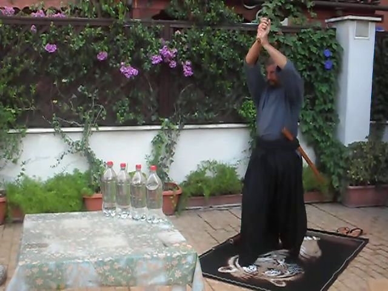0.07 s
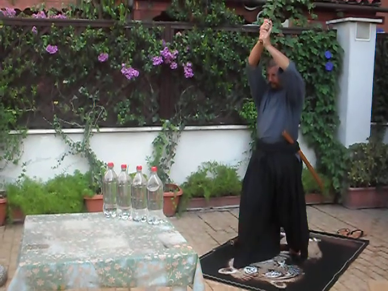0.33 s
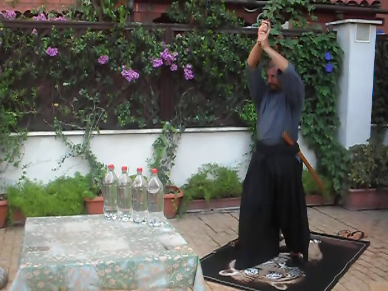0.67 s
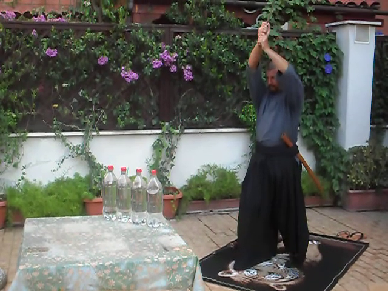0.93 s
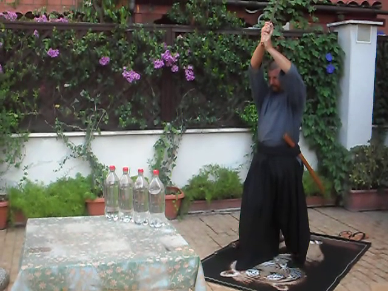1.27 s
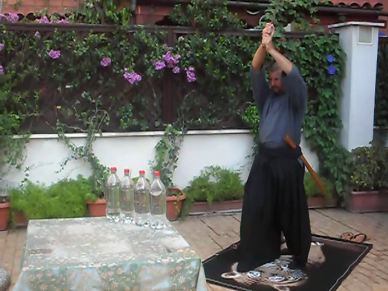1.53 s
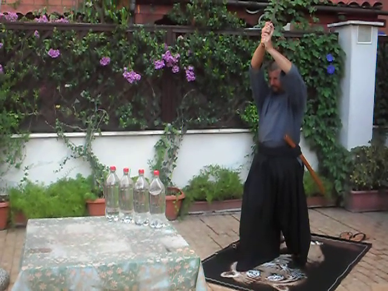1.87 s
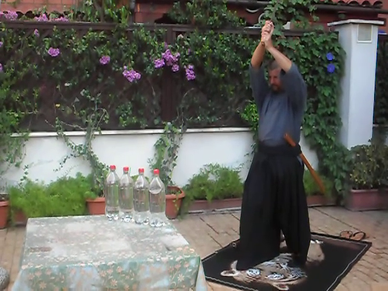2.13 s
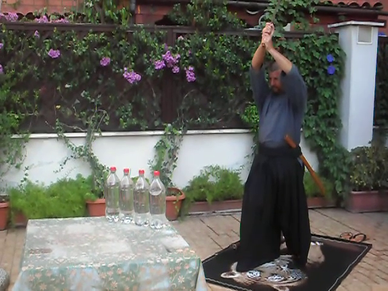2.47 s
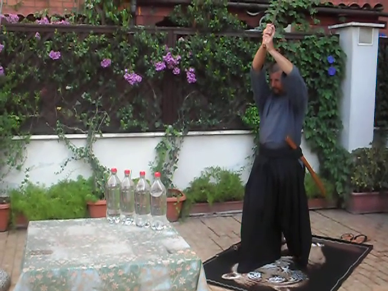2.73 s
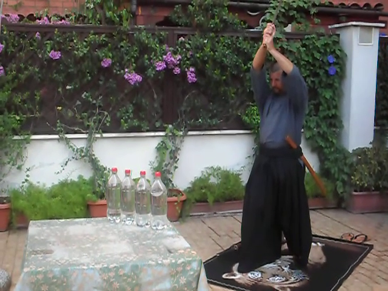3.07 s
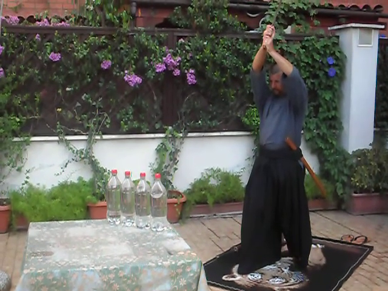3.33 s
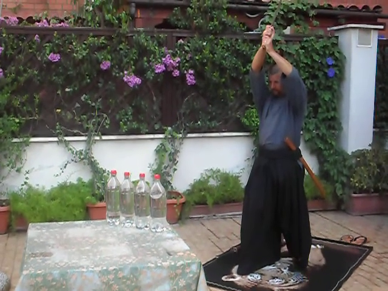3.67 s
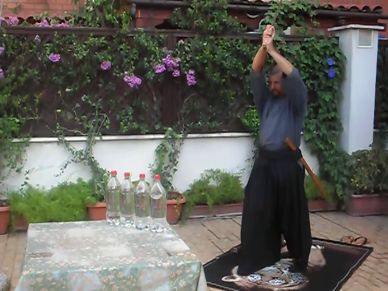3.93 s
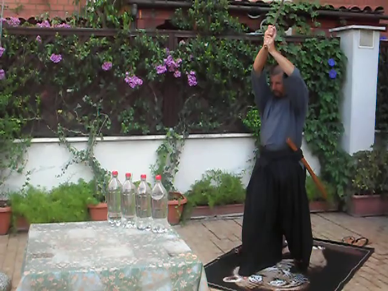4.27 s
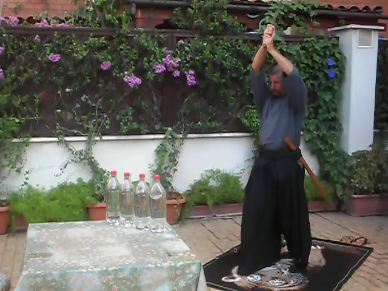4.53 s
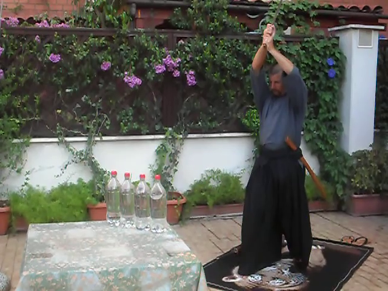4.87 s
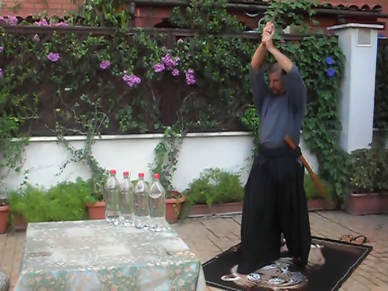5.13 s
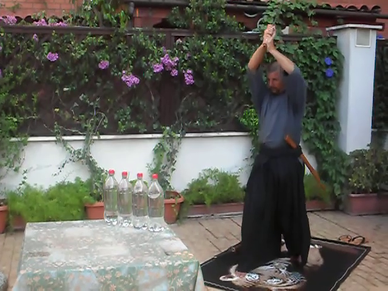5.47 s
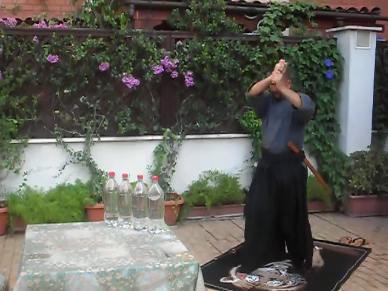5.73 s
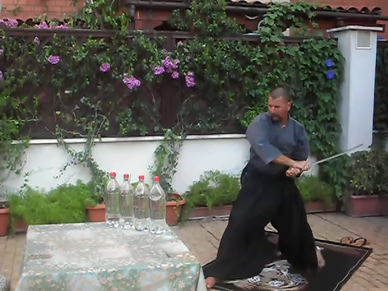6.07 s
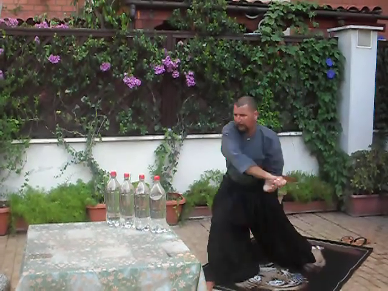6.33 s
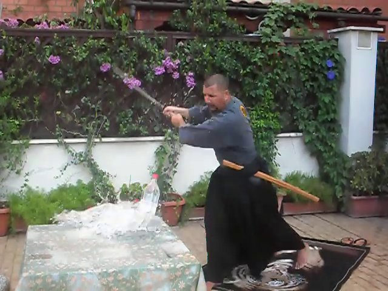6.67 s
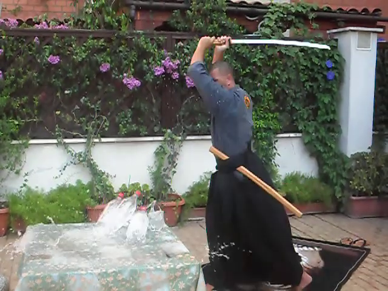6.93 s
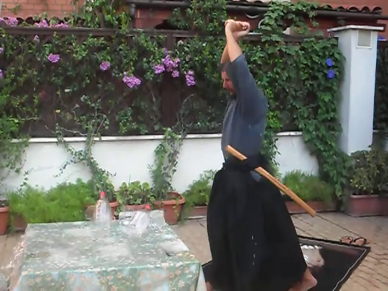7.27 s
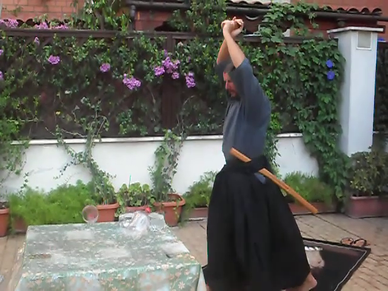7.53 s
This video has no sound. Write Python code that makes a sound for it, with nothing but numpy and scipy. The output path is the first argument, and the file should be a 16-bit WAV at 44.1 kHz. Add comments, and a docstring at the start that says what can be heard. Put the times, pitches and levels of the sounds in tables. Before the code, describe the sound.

A low, steady outdoor rumble with faint hiss runs throughout on a quiet walled patio. A tiny dry tick comes at 0.4 seconds. Around 1.2 seconds a small bird gives two quick, faint warbles, and three soft, distant hoots fall between 1.1 and 2.3 seconds. Only the background follows until a few light ticks at 6.3 seconds. At 6.5 seconds a sword cuts through four water-filled plastic bottles almost at once: a loud crack with a thump, slightly overloading the microphone and echoing briefly off the walls. Water slops and splats onto a table until about 6.9 seconds, with small snaps of plastic, then spatters brightly on the paving to the end. At 7.1 and 7.6 seconds two cut bottles hit the ground with loud, hollow, crunching thuds. Water sloshes inside each, and the last leaves a short hollow ring.

```python
"""In the low rumble of a quiet walled patio, a small bird warbles twice among faint, distant hoots.
After a few dry ticks, at 6.5 s, a sword cuts four water-filled plastic bottles on a table: each shell
cracks, each water column thumps in its modes, and the loudest blows overload the microphone.
Water slops onto the table, then spatters on the paving as countless small impacts. At 7.1 s and 7.6 s
two cut bottles land with hollow thuds; water sloshes inside them and the enclosed air resonates."""
import sys
import numpy as np
from scipy import signal
from scipy.fft import rfft, irfft
from scipy.io import wavfile
from scipy.ndimage import uniform_filter1d

SR = 44100
rng = np.random.default_rng(int(sys.argv[2]) if len(sys.argv) > 2 else 0)


def inscribe(sig):
    """Save sig as 16-bit PCM at rate SR to the path in sys.argv[1].

    A 1-D sig is mono; a 2-D sig holds one channel per row.
    Samples are clipped to [-1, 1] before scaling.
    """
    pcm = np.round(np.clip(np.atleast_2d(sig).T, -1, 1) * 32767)
    wavfile.write(sys.argv[1], SR, pcm.astype(np.int16))


N = 340011
TIME = np.arange(N) / SR
RING_TIME = TIME[:SR // 2]

# spectrum of the outdoor background: frequency_hz, level_db
AIR_SPECTRUM = [(8.8, -63), (15, -1), (37, 1.5), (108, -12.5), (124, -15.5), (226, -18.5), (306, -20.5),
                (332, -23), (414, -24), (461, -25), (529, -26), (2330, -35), (6070, -38), (7350, -39),
                (10500, -40.5), (13600, -57), (22000, -120)]
# reverberation time of the patio: frequency_hz, t60_s
PATIO_DECAY = [(120, 0.39), (400, 0.35), (1000, 0.44), (2500, 0.37), (6000, 0.32), (11000, 0.14)]
# first reflections from ground and walls: delay_s, level_db
REFLECTIONS = [(.0052, -18.5), (0.0112, -23), (0.0272, -15.5), (.062, -30), (0.075, -25)]
# distant hoots: start_s, length_s, pitch_hz, level_db
HOOTS = [(1.121, 0.057, 586, -57), (1.63, 0.15, 506, -62), (2.02, 0.23, 475.5, -66)]
# the bird's syllables: start_s, length_s, centre_hz, warble_hz, level_db
SYLLABLES = [(1.187, 0.078, 4250, 26, -56), (1.253, .074, 3420, 28, -59)]
# dry ticks before the cut: start_s, peak_db, centre_hz, t60_s
TICKS = [(0.4435, -38.5, 1000, .008), (6.2882, -39, 2780, .019), (6.289, -41, 5700, .008),
         (6.295, -39, 1880, 0.02)]
# cut plastic snapping as it tumbles: start_s, peak_db, centre_hz
SNAPS = [(6.661, -25, 2560), (6.762, -29, 3500), (6.843, -28, 3070), (7.553, -19, 2208)]
# the largest drops striking stone: start_s, peak_db
BIG_DROPS = [(6.821, -20.5), (6.977, -27), (7.01, -19), (7.24, -25), (7.3018, -19), (7.341, -19),
             (7.454, -24), (7.4774, -21.5)]
# air resonances of the open bottles: start_s, pitch_hz, climb_hz_per_s, level_db, t60_s
CAVITY_TONES = [(7.255, 290, 651, -37, 0.79), (7.615, 436.4, 0, -18, 0.34)]
# water surging inside each fallen bottle: start_s, level_db
SLOSHES = [(7.105, -24.5), (7.605, -26)]
# spectrum of that enclosed water: frequency_hz, level_db
SLOSH_SPECTRUM = [(100, -30), (220, -9), (330, -3), (480, -3.5), (700, -8.5), (1050, -11.5), (1600, -17.5),
                  (5000, -33), (12000, -60)]
# masses of water landing on the table: start_s, hold_s, level_db
SLOPS = [(6.5, 0.051, -26), (6.62, 0.076, -28), (6.754, .012, -29), (6.816, .012, -34.5), (6.9, .005, -37)]
# spectrum of water on the table: frequency_hz, level_db
SLOP_SPECTRUM = [(29, -43), (50, -1.5), (297, 3.5), (436, -4), (840, 0.5), (898, -5.5), (1080, -5.5),
                 (2020, -11), (3040, -12.5), (4560, -19.5), (6700, -19), (9610, -31), (11000, -50),
                 (14300, -79), (22000, -120)]
# heavy splats of water: start_s, peak_db, centre_hz, t60_s
SPLATS = [(6.579, -17, 260, 0.033), (6.623, -17, 330, 0.05), (6.644, -20.5, 487, 0.16),
          (6.688, -19.5, 746, 0.074), (6.76, -20.5, 149, 0.047), (6.778, -23.5, 406, 0.078),
          (6.825, -23.5, 720, 0.067)]
# showers of thrown water reaching the paving: start_s, level_db, t60_s
SHOWERS = [(6.49, -33, .36), (6.64, -44, 1.1), (6.914, -34, 1.3), (6.955, -35.5, 3.1), (7.255, -37.5, 13)]
# spectrum of drops on stone: frequency_hz, level_db
SPATTER_SPECTRUM = [(300, -16), (1200, -12), (2000, -6.5), (3000, -1), (4300, -4), (6000, -2.5),
                    (8000, -6.5), (10000, -10), (12000, -24)]
# blows on the ground, one list per fallen bottle: start_s, ring_db, crunch_db
LANDINGS = [
    [(7.0642, -0.5, -11), (7.0719, -0.5, -11.5), (7.0901, -9, -26), (7.0993, -5.5, -20)],
    [(7.5678, 0, -9), (7.5805, -10, -14), (7.5868, -3.5, -28)],
]
# modes set by the water left inside, one list per fallen bottle: pitch_hz, level_db, t60_s
BOTTLE_MODES = [
    [(238, -20.5, 0.11), (310, -8.5, 0.042), (360, -30, 0.082), (383.7, 1, 0.065), (436, -11.5, 0.095),
     (515, -15.5, 0.069), (574, -24, 0.12), (640, -31, 0.12), (864, -14.5, 0.11), (1007, -19, 0.065),
     (1120, -20, 0.067)],
    [(384, -5.5, 0.1), (441.3, -5.5, 0.14), (494, -2.5, 0.07), (716, -14, .08), (799, -12, .07),
     (876, -10.5, 0.088), (924, -16.5, 0.17), (1043, -16, 0.089), (1192, -6.5, 0.061), (1303, -8, 0.11),
     (1384, -16.5, 0.057), (1606, -17, 0.1), (2670, -20.5, 0.033)],
]
# spectrum of a crumpling shell: frequency_hz, level_db
CRUNCH_SPECTRUM = [(100, -43), (280, 6.5), (420, 11.5), (900, 3.5), (1300, -5), (1800, -9), (2800, -7),
                   (5000, -14), (10000, -27)]
# the blade bursting one bottle after another: start_s, crack_db, thump_db
CUTS = [(6.4717, -2.5, -11.5), (6.4755, -1.5, -8.5), (6.4816, -15, -11), (6.4896, -3.5, -11)]
# spectrum of splitting plastic: frequency_hz, level_db
CRACK_SPECTRUM = [(100, -34), (400, 4), (850, 9), (1150, 3.5), (1500, 4), (2000, 2), (2900, 0), (3500, 0),
                  (4500, -2), (5800, -0.5), (8000, -6.5), (9800, -9.5), (12000, -6.5)]
# modes of the struck water columns and the table: pitch_hz, level_db, t60_s
THUMP_MODES = [(130, -11.5, 0.26), (149, -3, 0.07), (260, 4, 0.059), (313, 0, 0.12), (353, 0.5, 0.051),
               (497, -8.5, 0.1), (725, -7.5, 0.13), (789, -10, 0.074), (827, -4.5, 0.12), (1015, -10, 0.11),
               (1142, -12.5, 0.11), (1940, -15.5, 0.19), (2940, -3.5, 0.053)]


def amp(db):
    return 10 ** (np.asarray(db) / 20)


def unit_rms(x):
    return x / np.sqrt(np.mean(x ** 2) + 1e-20)


def log_interp(points, hz):
    frequencies, values = np.transpose(points)
    return np.interp(np.log(hz + 1), np.log(frequencies + 1), values)


def add(mix, start_s, sound):
    part = mix[round(start_s * SR):][:len(sound)]
    part += sound[:len(part)]


def decay(t60_s, t=RING_TIME):
    """Damping: amplitude falls exponentially, by 60 dB in t60_s."""
    return np.exp(-np.log(1000) * t / t60_s)


def swell(start_s, t60_s, rise_s, hold_s=0):
    """An envelope of linear rise, hold and exponential decay."""
    age = TIME - start_s
    return np.clip(age / rise_s, 0, 1) * decay(t60_s, np.maximum(age - rise_s - hold_s, 0))


def wander(samples):
    """A moving average of noise fluctuates more slowly the longer its window."""
    return unit_rms(uniform_filter1d(rng.standard_normal(N), size=samples))


def coloured(x, spectrum):
    """Filtering multiplies spectra; the result has unit rms."""
    gain = amp(log_interp(spectrum, np.fft.rfftfreq(len(x), 1 / SR)))
    return unit_rms(irfft(rfft(x) * gain, len(x)))


def burst(spectrum, t60_s):
    """Dense tiny impulses merge into decaying noise."""
    return coloured(rng.standard_normal(len(RING_TIME)), spectrum) * decay(t60_s)


def band_burst(peak_db, centre_hz, octaves, t60_s):
    """A brief impact with its energy gathered in one band."""
    hz = np.geomspace(50, 16000, 40)
    band_db = -4.3 * (np.log2(hz / centre_hz) / octaves) ** 2
    sound = burst(np.c_[hz, band_db], t60_s)
    return amp(peak_db) * sound / abs(sound).max()


def ring(modes):
    """Free vibration is a sum of damped modes; neighbours swing in opposite directions."""
    return sum((-1) ** k * amp(db) * decay(t60_s) * np.sin(2 * np.pi * hz * RING_TIME)
               for k, (hz, db, t60_s) in enumerate(modes))


def drops(surges, spectrum, per_s, spread_db, spray, clump_db):
    """Shot noise: random impacts arrive in clumps over a fine spray; independent surges add in power."""
    sizes = amp(spread_db * np.minimum(rng.exponential(1, N), 5))
    impacts = sizes * rng.choice([-1, 1], N) * (rng.random(N) < per_s / SR)
    level = np.linalg.norm(surges, axis=0) * amp(clump_db * wander(450))
    return level * coloured(unit_rms(impacts) + spray * rng.standard_normal(N), spectrum)


def radiated(x, cutoff_hz):
    """A body much smaller than the wavelength radiates poorly, so bass is lost."""
    return signal.sosfilt(signal.butter(2, cutoff_hz, "high", fs=SR, output="sos"), x)


def low_pass(x, hz, taps):
    return signal.oaconvolve(x, signal.firwin(taps, hz, window=("kaiser", 8), fs=SR)[None], "same")


def air(level_db=-46, whine_hz=7140, whine_db=-77, whine_width_hz=120):
    """Broadband outdoor rumble and hiss, with a faint whine of narrow-band noise."""
    pole = np.exp(-np.pi * whine_width_hz / SR)
    flicker = signal.lfilter([1], [1, -pole], rng.standard_normal(N))
    whine = unit_rms(flicker * np.sin(2 * np.pi * whine_hz * TIME))
    return amp(level_db) * coloured(rng.standard_normal(N), AIR_SPECTRUM) + amp(whine_db) * whine


def reverberation(x, build_s=0.019, stretch=1):
    """A diffuse field builds between the walls, and each band decays at its own rate."""
    hz, t, bands = signal.stft(rng.standard_normal(SR), SR, nperseg=256)
    t60_s = stretch * log_interp(PATIO_DECAY, hz)[:, None]
    tail = signal.istft(bands * decay(t60_s, t), SR, nperseg=256)[1][:SR]
    tail *= 1 - np.exp(-TIME[:SR] / build_s)
    return signal.fftconvolve(x, tail / np.linalg.norm(tail))[:N]


def echoes(x, cutoff_hz=4500):
    """Early reflections are delayed copies, their treble absorbed by plants and cloth."""
    out = np.zeros(N)
    dulled = signal.lfilter(*signal.butter(1, cutoff_hz, fs=SR), x)
    for delay_s, db in REFLECTIONS:
        add(out, delay_s, amp(db) * dulled)
    return out


def hoots(blur=0.05):
    """Soft tones arch in pitch and level; random frequency modulation blurs them."""
    out = np.zeros(N)
    for start_s, length_s, hz, db in HOOTS:
        arch = np.sin(np.pi * TIME[:int(length_s * SR)] / length_s)
        pitch_hz = hz * (0.96 + 0.0435 * arch + blur * wander(200)[:len(arch)])
        add(out, start_s, amp(db) * arch * np.sin(2 * np.pi * np.cumsum(pitch_hz) / SR))
    return out


def bird(depth=0.126, rasp=0.026, edge_s=0.01):
    """Frequency modulation of a whistle: a periodic swing gives the warble, a random one the rasp."""
    out = np.zeros(N)
    for start_s, length_s, centre_hz, warble_hz, db in SYLLABLES:
        t = TIME[:int(length_s * SR)]
        warble = depth * np.cos(2 * np.pi * warble_hz * t)
        pitch_hz = centre_hz * (1 + warble + rasp * wander(30)[:len(t)])
        level = amp(db) * np.minimum(np.minimum(t, length_s - t) / edge_s, 1)
        add(out, start_s, level * np.sin(2 * np.pi * np.cumsum(pitch_hz) / SR))
    return out


def clicks():
    """Heavily damped transients: dry ticks, snaps of plastic and single large drops."""
    out = np.zeros(N)
    for start_s, db, centre_hz, t60_s in TICKS:
        add(out, start_s, band_burst(db, centre_hz, octaves=0.56, t60_s=t60_s))
    for start_s, db, centre_hz in SNAPS:
        add(out, start_s, band_burst(db, centre_hz, octaves=0.48, t60_s=0.019))
    for start_s, db in BIG_DROPS:
        add(out, start_s, band_burst(db, centre_hz=5300, octaves=0.6, t60_s=0.013))
    return out


def cavity_hum(waver=0.055):
    """Air resonance in the open bottles wavers with the water; the first tone climbs as it drains."""
    out = np.zeros(N)
    for start_s, hz, climb_hz_per_s, db, t60_s in CAVITY_TONES:
        glide_hz = hz + climb_hz_per_s * np.maximum(TIME - start_s, 0)
        pitch_hz = glide_hz * (1 + waver * wander(250))
        level = amp(db) * swell(start_s, t60_s, rise_s=0.023)
        out += level * np.sin(2 * np.pi * np.cumsum(pitch_hz) / SR)
    return out


def sloshes():
    """Inertia throws the water in a fallen bottle against its walls."""
    surges = [amp(db) * swell(start_s, t60_s=0.26, rise_s=0.021, hold_s=0.024) for start_s, db in SLOSHES]
    return drops(surges, SLOSH_SPECTRUM, per_s=700, spread_db=3, spray=0.69, clump_db=1)


def spatter():
    """Fine drops stop abruptly on stone, and short impacts make bright noise."""
    showers = [amp(db) * swell(start_s, t60_s, rise_s=0.037) for start_s, db, t60_s in SHOWERS]
    return drops(showers, SPATTER_SPECTRUM, per_s=3000, spread_db=4.6, spray=0.5, clump_db=1)


def slops():
    """Masses of water make low impact noise on the table; a thin runoff follows and dries up."""
    surges = [amp(db) * swell(start_s, t60_s=0.17, rise_s=0.021, hold_s=hold_s)
              for start_s, hold_s, db in SLOPS]
    runoff = amp(-42) * swell(start_s=6.8, t60_s=0.7, rise_s=0.05, hold_s=0.51)
    out = drops(surges + [runoff], SLOP_SPECTRUM, per_s=900, spread_db=2.5, spray=0.76, clump_db=1.5)
    for start_s, db, centre_hz, t60_s in SPLATS:
        add(out, start_s, band_burst(db, centre_hz, octaves=0.7, t60_s=t60_s))
    return radiated(out, cutoff_hz=50)


def falling_bottles():
    """Impact crumples the shell and excites the modes of each bottle, which rocks and knocks again."""
    out = np.zeros(N)
    for blows, modes in zip(LANDINGS, BOTTLE_MODES):
        for start_s, ring_db, crunch_db in blows:
            crunch = amp(crunch_db) * burst(CRUNCH_SPECTRUM, t60_s=0.13)
            add(out, start_s, amp(ring_db) * ring(modes) + crunch)
    return radiated(out, cutoff_hz=236)


def sword_cut():
    """Fracture of each shell radiates a crack while the blade's impulse rings the water and table."""
    out = np.zeros(N)
    for start_s, crack_db, thump_db in CUTS:
        crack = amp(crack_db) * burst(CRACK_SPECTRUM, t60_s=0.067)
        add(out, start_s, crack + amp(thump_db) * ring(THUMP_MODES))
    return radiated(out, cutoff_hz=106)


def scene():
    """Superposition of near sounds, their echoes and reverberation, far birds and the open air."""
    blade, bottles = sword_cut(), falling_bottles()
    splash = slops() + spatter() + clicks()
    calls = bird() + hoots()
    near = blade + bottles + splash + sloshes() + cavity_hum() + echoes(blade + amp(-4) * bottles)
    tail = reverberation(amp(-15) * blade + amp(-20) * bottles + amp(-11.5) * splash)
    far = amp(2.5) * calls + amp(-3.5) * reverberation(calls, stretch=1.1)  # scattered among houses
    return (near + tail + far + air())[None]


def record(dry, mic_hz=10800, ceiling=0.71, overtones_db=-5, limit_hz=16200):
    """Saturation in a band-limited microphone's amplifier adds overtones; filters soften the highest."""
    heard = low_pass(dry, mic_hz, taps=71)
    clipped = heard / (1 + (heard / ceiling) ** 10) ** (1 / 10)
    body = low_pass(clipped, mic_hz, taps=101)
    shelved = body + amp(overtones_db) * (clipped - body)
    return low_pass(shelved, limit_hz, taps=255)


dry = scene()
out = record(dry)
inscribe(out)
```